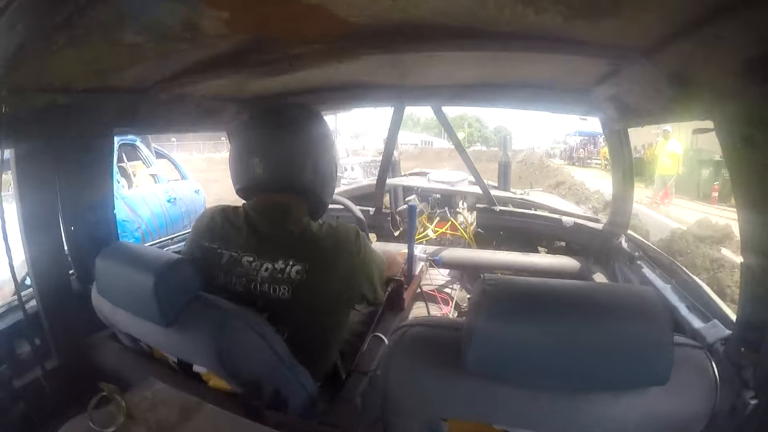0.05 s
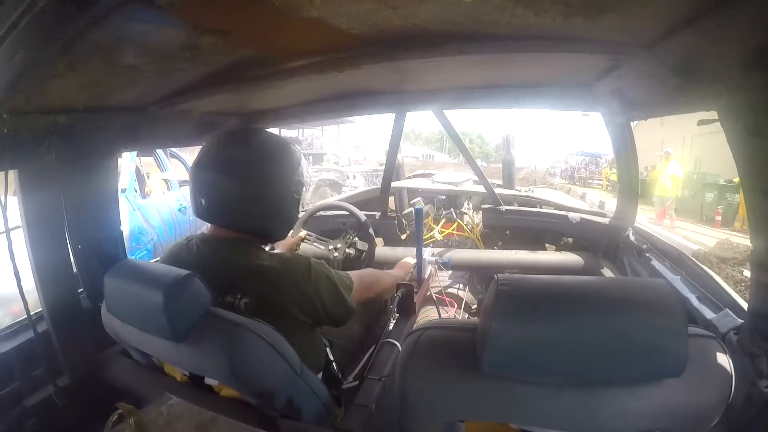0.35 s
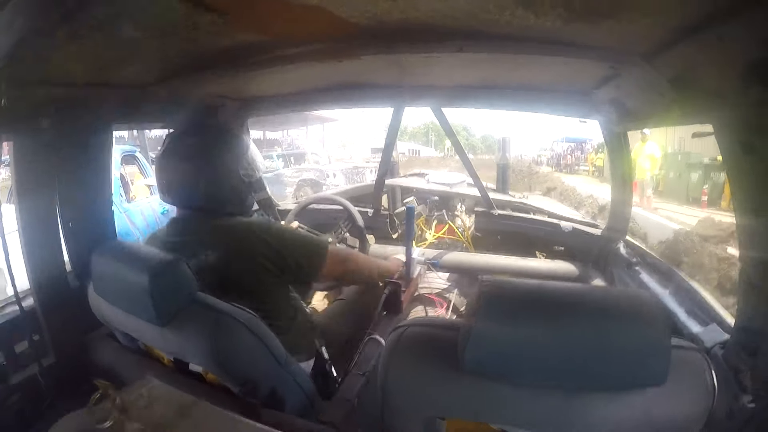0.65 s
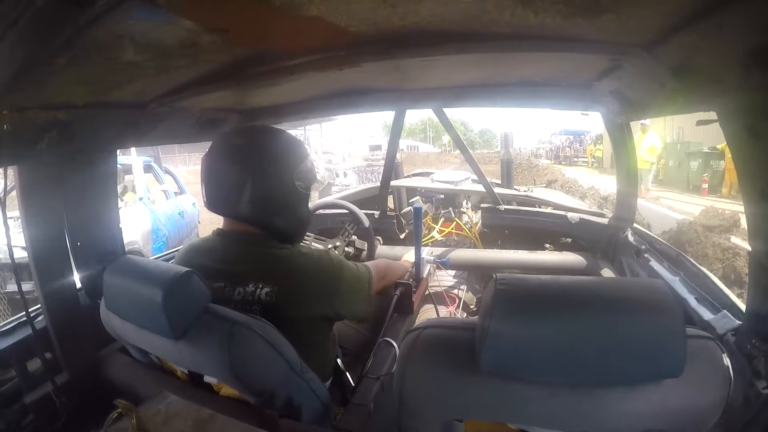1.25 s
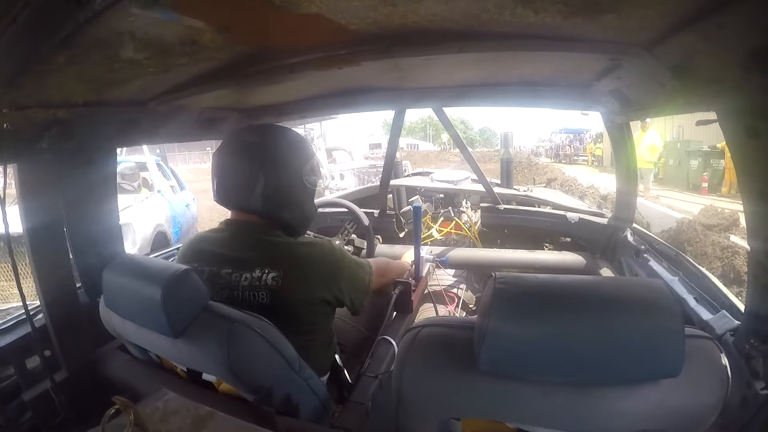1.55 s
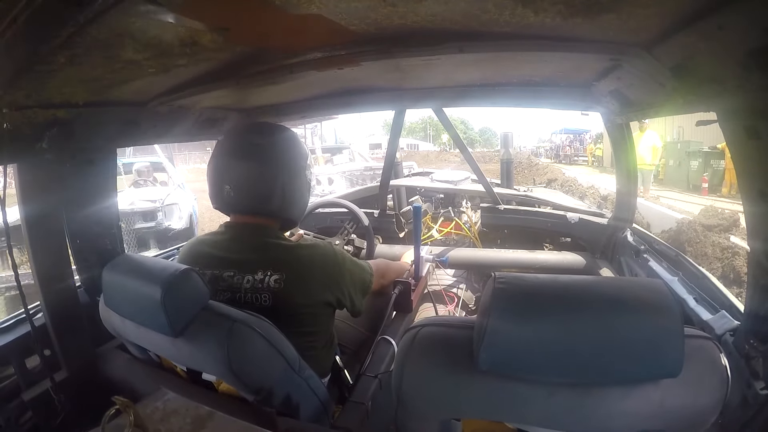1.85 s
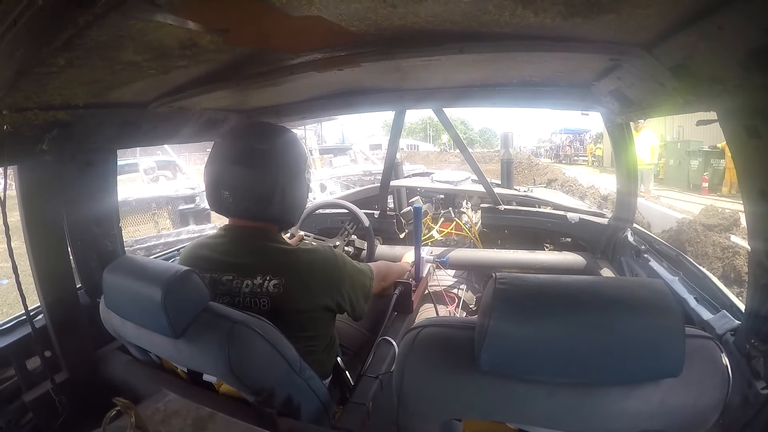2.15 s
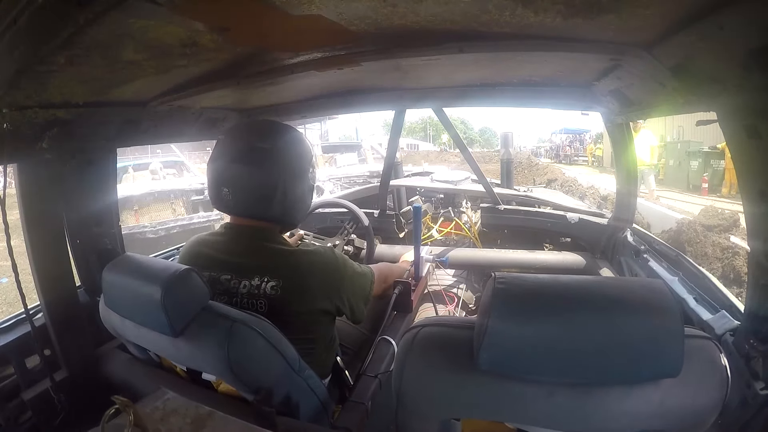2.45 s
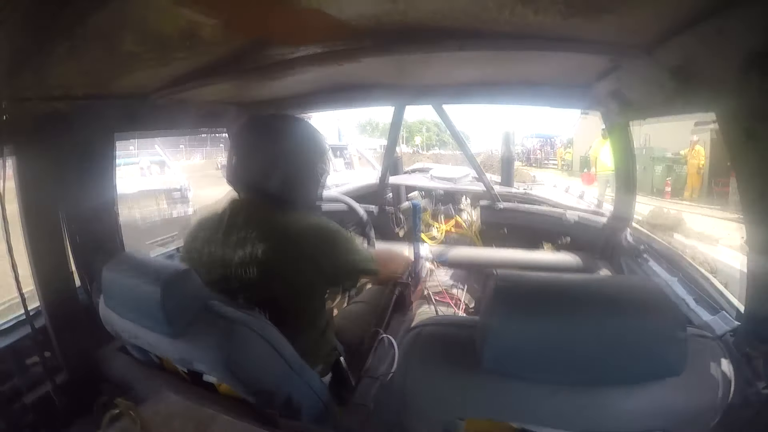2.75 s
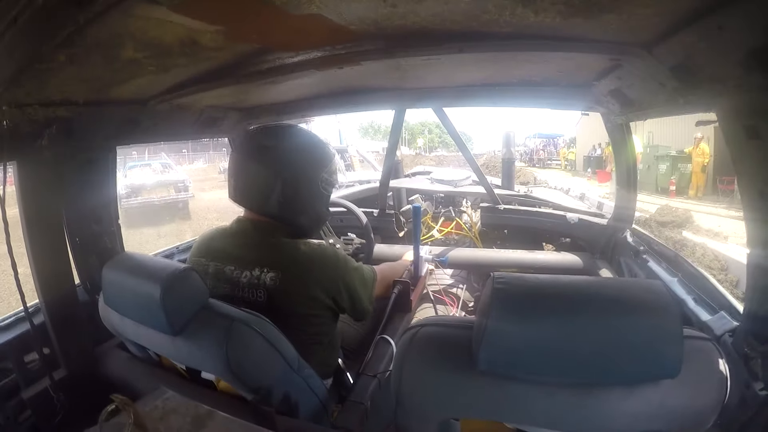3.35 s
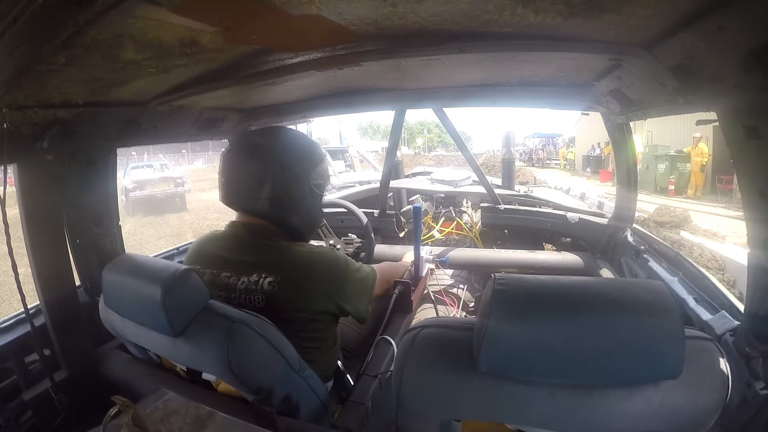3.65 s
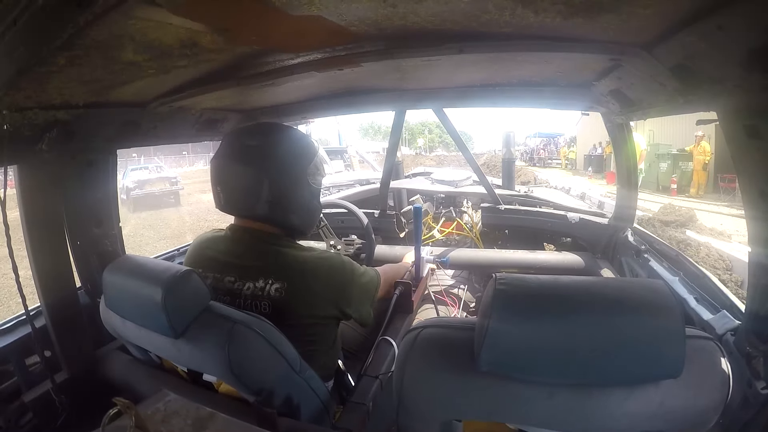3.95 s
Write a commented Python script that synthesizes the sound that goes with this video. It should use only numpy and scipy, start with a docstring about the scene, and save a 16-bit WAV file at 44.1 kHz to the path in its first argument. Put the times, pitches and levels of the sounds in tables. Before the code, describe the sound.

Heard from behind the driver's seat, a big engine rumbles steadily as a bare-shelled car lurches over dirt. The body thumps and loose panels clank and chatter in two main bouts, with a faint hiss between them.

```python
"""A V8 burbles at low revs, heard inside a stripped demolition-derby car lurching over rutted dirt.
Each jolt booms through the bare shell and sets loose metal chattering. Panels clank, ring and
briefly squeal; the tyres spray dirt on the body. A hiss, probably air drawn past the nearly shut
throttle, comes and goes. A fast limiter squashes the peaks."""
import sys
import numpy as np
from scipy import signal
from scipy.fft import rfft, irfft
from scipy.io import wavfile
from scipy.ndimage import uniform_filter1d, minimum_filter1d

SR = 44100
rng = np.random.default_rng(int(sys.argv[2]) if len(sys.argv) > 2 else 0)


def output_pcm(signal):
    """Save a mono or channel-first signal as 16-bit PCM at the path in sys.argv[1].

    Samples are clipped to [-1, 1] before scaling.
    """
    pcm = np.clip(np.atleast_2d(signal).T, -1, 1) * 32767
    wavfile.write(sys.argv[1], SR, np.round(pcm).astype(np.int16))


N = 176400

# Engine speed. Each row: time in seconds, firing rate in Hz.
FIRING_RATE = [(0, 103.7), (.3, 110.8), (1.1, 109.3), (1.45, 107), (1.72, 112.3), (2.22, 101.9),
               (2.32, 109.6), (2.39, 123.1), (2.48, 110.8), (2.75, 99.2), (3.3, 113.5), (3.55, 106.5),
               (3.8, 110.1)]
# Ground jolts. Each row: start in seconds, then low boom, cabin boom, panel boom and chatter in dB.
JOLTS = [(0.004, -27, -32, -26.5, -29), (0.054, -43, -15, -33, -31), (0.164, -13, -41.5, -19, -23.5),
         (0.619, -22, -41, -37, -38.5), (0.646, -16, -24.5, -21.5, -36), (0.664, -43, -15, -14.5, -28.5),
         (0.714, -16, -15, -26, -27), (0.758, -16.5, -16, -22, -22), (0.869, -28, -11, -22, -31.5),
         (0.964, -33, -12, -22.5, -46), (1.054, -27, -32, -22.5, -33), (1.11, -21, -13, -41, -38),
         (1.195, -25.5, -47, -19, -37), (1.414, -14.5, -16.5, -25, -32.5), (1.579, -36, -22, -18.5, -34),
         (2.53, -44, -19.5, -25.5, -25), (2.557, -18, -12.5, -37, -24.5), (2.599, -23, -46, -26, -24.5),
         (2.664, -25, -13, -24, -31), (2.72, -17, -14.5, -19, -29.5), (2.818, -28, -16, -24.5, -26),
         (3.072, -11, -30, -19.5, -31), (3.137, -17, -29, -34, -50)]
# Blows on loose panels. Each row: start in seconds, relative level in dB.
PANEL_BLOWS = [(0.055, -32), (0.062, -18.5), (0.152, -21), (0.17, -21), (0.225, -30), (0.528, -34.5),
               (0.635, -32), (0.666, -23), (0.681, -25.5), (0.693, -28), (0.761, -13), (0.766, -21.5),
               (0.818, -25.5), (0.848, -24.5), (0.892, -27), (0.962, -21), (0.968, -18.5), (0.974, -18.5),
               (0.989, -25), (1.009, -22.5), (1.036, -28), (1.061, -24), (1.087, -32), (1.122, -29),
               (1.143, -28.5), (1.233, -23), (1.437, -44), (1.585, -24), (1.637, -29.5), (2.601, -11),
               (2.704, -21), (2.724, -14), (2.815, -22.5), (2.824, -19), (2.894, -27.5), (2.92, -29.5),
               (3.08, -28.5), (3.11, -25), (3.152, -31), (3.193, -34.5), (3.224, -51), (3.286, -48),
               (3.347, -43.5), (3.365, -45), (3.427, -45), (3.525, -47.5), (3.587, -43)]
# Sheet metal response. Each row: frequency in Hz, gain in dB.
SHEET_METAL = [(60, -42), (170, -8), (255, 11), (345, 1), (480, 4.5), (630, 3), (860, -2.5), (1120, -8.5),
               (1330, -20.5), (1580, -7), (1830, -13), (2290, -14.5), (2650, -27.5), (3400, -32),
               (6000, -39), (15000, -66.5)]


def engine():
    """The firing rate drones in the cabin; unequal cylinders and rough ground add a low burble."""
    # Each row: time in seconds, relative level in dB.
    drone_levels = [(0, -20), (.14, -38.5), (.35, -28.5), (.52, -29.5), (.62, -33), (1.1, -32.5),
                    (1.38, -41.5), (1.46, -22.5), (1.62, -40), (1.74, -31), (1.84, -36), (1.93, -28.5),
                    (2.02, -37), (2.13, -30.5), (2.22, -38), (2.295, -22.5), (2.355, -35.5), (2.39, -28),
                    (2.5, -40), (2.7, -23), (2.98, -40), (3.38, -33), (3.55, -39), (3.85, -29), (3.93, -43)]
    burble_levels = [(0, -27.5), (.2, -26.5), (.55, -35), (.8, -26.5), (1.2, -27), (1.35, -31.5),
                     (1.88, -34), (2.05, -40), (2.32, -36), (2.5, -36), (2.62, -26), (2.95, -32.5),
                     (3.2, -36), (3.75, -34.5), (4, -41.5)]
    # Strength in dB of the eight cylinders, in firing order.
    cylinders_db = [4.5, -0.5, 1, 1, 0, 1.5, 0.5, 2]
    # Bare cabin response. Each row: frequency in Hz, gain in dB.
    cabin = [(10, -39), (20, -29.5), (39, 4), (48, -0.5), (64, -6.5), (85, -13), (125, -22), (148, -14.5),
             (185, -22.5), (245, -13), (310, -36), (500, -49.5), (5000, -100)]
    wobble_rad, flutter_db, scatter_db = 0.4, 1.4, 4
    cycles = np.cumsum(curve(FIRING_RATE)) / SR
    drone = np.sqrt(2) * np.sin(2 * np.pi * cycles + wobble_rad * wander(rate_hz=30))
    drone *= undb(curve(drone_levels) + 1 + flutter_db * wander(rate_hz=30))
    ground = unit_rms(colour(rng.standard_normal(N), cabin))
    firings = np.arange(1, int(cycles[-1]))
    firing_db = np.array(cylinders_db)[firings % len(cylinders_db)]
    strength = undb(firing_db + scatter_db * rng.standard_normal(len(firings)))
    pulses = np.zeros(N)
    pulses[np.searchsorted(cycles, firings)] = strength - strength.mean()
    burble = steady(unit_rms(colour(pulses, cabin)) + undb(-4) * ground, window_samples=4000)
    return drone + burble * undb(curve(burble_levels) + 1)


def shell_booms():
    """Each jolt rings the low modes of the shell, slightly detuned, with a cap on the drive."""
    # Each row: frequency in Hz, T60 in seconds, gain in dB, group (0 low, 1 cabin, 2 panel).
    shell_modes = [(36.1, 0.69, -8.5, 0), (63, 0.1, -1.5, 0), (88, 0.17, 2, 1), (114.7, 0.18, 0, 1),
                   (165, 0.19, -9.5, 2), (204.7, 0.21, -6, 2), (249.9, 0.31, -4.5, 2)]
    rise_s, cap_db = 0.004, -18.5
    out, t = np.zeros(N), np.arange(SR // 2) / SR
    for start_s, *drive_db, _ in JOLTS:
        boom = np.zeros(len(t))
        for hz, t60_s, mode_db, group in shell_modes:
            detune, phase_rad = rng.standard_normal(2)
            mode = np.sin(2 * np.pi * hz * (1 + 0.026 * detune) * t + phase_rad)
            gain = undb(mode_db + min(drive_db[int(group)], cap_db))
            boom += gain * mode * np.exp(-np.log(1000) * t / t60_s)
        add(out, start_s, boom * (1 - np.exp(-t / rise_s)))
    return out * undb(2.5)


def metal_chatter():
    """Loose metal patters after each jolt, dying fast and then settling slowly."""
    rise_s, fall_s, settle_db, settle_s, clump_db = 0.0028, 0.056, -11, 0.24, 2.5
    power, t = np.zeros(N), np.arange(N) / SR
    envelope = impact_envelope(t, rise_s, fall_s, settle_db, settle_s)
    for start_s, *_, db in JOLTS:
        add(power, start_s, (undb(db) * envelope) ** 2)
    patter = steady(colour(taps(per_s=900), SHEET_METAL), window_samples=2400)
    return patter * np.sqrt(power) * undb(-7 + clump_db * wander(rate_hz=120))


def panel_clanks():
    """Loose panels slap dully; edges that meet add a bright tick."""
    # Each row: start in seconds, relative level in dB.
    edge_blows = [(0.0024, -23), (0.0419, -37.5), (0.0628, -23), (0.1601, -24.5), (0.7627, -19),
                  (0.7674, -28), (0.967, -25.5), (0.9764, -23.5), (2.6003, -30), (2.696, -25.5),
                  (2.7253, -17.5), (2.8303, -26)]
    # Each row: frequency in Hz, gain in dB.
    edge_colour = [(800, -27), (2300, 9), (2850, 11), (3300, -5.5), (3800, -0.5), (4600, -7.5), (5700, -5),
                   (9000, -17), (15000, -33)]
    slaps = strikes(PANEL_BLOWS, SHEET_METAL, rise_s=0.0025, fall_s=0.0023, tail_db=-28.5)
    ticks = strikes(edge_blows, edge_colour, rise_s=0.0011, fall_s=0.0013, tail_db=-27)
    return slaps * undb(20) + ticks * undb(12)


def strikes(blows, body_colour, rise_s, fall_s, tail_db):
    """Brief scuffing contacts ring a body; harder blows lose more bass."""
    out, t = np.zeros(N), np.arange(SR // 8) / SR
    body = impulse_response(body_colour)
    contact = impact_envelope(t, rise_s, fall_s, tail_db, tail_s=0.011)
    hardest_db = max(db for _, db in blows)
    for start_s, db in blows:
        hit = signal.fftconvolve(rng.standard_normal(len(t)) * contact, body)
        cutoff_hz = 780 * undb((db - hardest_db) / 2)
        hit = signal.lfilter(*signal.butter(1, cutoff_hz, "high", fs=SR), hit)
        add(out, start_s, undb(db) * hit / np.linalg.norm(hit))
    return out


def panel_ring():
    """Struck panels ring on briefly, each blow favouring different modes."""
    # Each row: frequency in Hz, gain in dB.
    panel_modes = [(484, -4.5), (630, 1), (820, 0), (1115, -5.5), (1565, -15), (1825, -6.5), (2230, -9.5),
                   (2810, -19), (3650, -24.5)]
    rise_s, t60_s, scatter_db = 0.0025, 0.14, 3
    out, t = np.zeros(N), np.arange(SR // 2) / SR
    hz, mode_db = np.array(panel_modes, float).T
    envelope = (1 - np.exp(-t / rise_s)) * np.exp(-np.log(1000) * t / t60_s)
    for start_s, db in PANEL_BLOWS:
        detune, emphasis = rng.standard_normal((2, len(hz)))
        modes = np.sin(2 * np.pi * np.outer(hz * (1 + 0.0098 * detune), t))
        gains = undb(db + mode_db + scatter_db * emphasis)
        add(out, start_s, gains @ modes * envelope)
    return out * undb(-20)


def metal_squeals():
    """Metal slides on metal for a moment at an unsteady pitch."""
    # Each row: centre in seconds, half-width in seconds, pitch in Hz, peak in dB.
    squeals = [(2.573, 0.011, 2280, -32.5), (2.828, 0.012, 860, -27.5)]
    out, t = np.zeros(N), np.arange(N) / SR
    for centre_s, half_width_s, hz, db in squeals:
        tone = np.sin(2 * np.pi * hz * t + 0.5 * wander(rate_hz=120))
        out += tone * np.exp(-((t - centre_s) / half_width_s) ** 2) * undb(db)
    return out


def dirt_spray():
    """Grains thrown by the tyres crackle against the body in clumps."""
    # Each row: time in seconds, level in dB.
    spray_levels = [(0.1, -54), (.5, -67), (1.1, -53.5), (2.8, -77)]
    # Each row: frequency in Hz, gain in dB.
    grain_colour = [(1000, 14), (6300, 1), (15000, -11)]
    clump_db = 5
    grains = unit_rms(colour(taps(per_s=300), grain_colour))
    return grains * undb(curve(spray_levels) + clump_db * np.tanh(wander(rate_hz=51)))


def air_hiss():
    """Air hisses through a narrow gap, throbbing with the intake; weak flow is duller and sputters."""
    # Each row: time in seconds, relative level in dB.
    flow_levels = [(0, -58), (.2, -67), (.55, -73), (.8, -68), (1.08, -59.5), (1.7, -56), (1.95, -54),
                   (2.18, -53), (2.26, -59), (2.35, -60), (2.42, -53), (2.58, -49), (2.72, -57), (3.0, -75),
                   (3.2, -65), (3.38, -64), (3.55, -68), (4, -56)]
    # Each row: frequency in Hz, gain in dB.
    gap_colour = [(300, -9), (750, -4), (865, 5), (970, 1), (1100, 10), (1330, -2), (1630, 6), (1830, 0),
                  (2300, 7), (2480, 1), (3000, 2), (3650, -4), (4050, 0), (4380, -4), (5400, -3), (5950, 1),
                  (6400, -4), (7000, -2), (8500, -10), (13600, -13), (15300, -18)]
    split_hz, full_treble_db = 7240, -47
    flow_db = curve(flow_levels)
    air = unit_rms(colour(rng.standard_normal(N), gap_colour))
    low = signal.sosfiltfilt(signal.butter(2, split_hz, fs=SR, output="sos"), air)
    treble_gain = undb(0.1749 * (flow_db - full_treble_db))
    cycles = np.cumsum(curve(FIRING_RATE)) / SR
    throb = 1 + 0.23 * np.sin(np.pi * cycles + wander(rate_hz=30))  # half the firing rate
    flicker_db = 0.78 * wander(rate_hz=50) / treble_gain
    return (low + (air - low) * treble_gain) * throb * undb(flow_db + 5 + flicker_db)


def taps(per_s):
    """Random small impacts of unequal strength."""
    impulses = (rng.random(N) < per_s / SR) * rng.choice([-1, 1], N)
    strength_db = 3 * np.minimum(rng.exponential(size=N), 4)
    return impulses * undb(strength_db)


def impact_envelope(t, rise_s, fall_s, tail_db, tail_s):
    """Quick rise, fast fall and a weaker, slower tail."""
    return (1 - np.exp(-t / rise_s)) * (np.exp(-t / fall_s) + undb(tail_db) * np.exp(-t / tail_s))


def undb(db):
    """Decibels to gain."""
    return 10 ** (np.asarray(db) / 20)


def unit_rms(x):
    """Scale to rms 1."""
    return x / np.sqrt(np.mean(x ** 2) + 1e-18)


def curve(rows):
    """Join (seconds, value) rows by straight lines."""
    return np.interp(np.arange(N) / SR, *np.array(rows, float).T)


def wander(rate_hz):
    """Smooth random drift of rms 1."""
    hold = max(int(SR / rate_hz), 2)
    steps = np.repeat(rng.standard_normal(N // hold + 1), hold)
    return unit_rms(uniform_filter1d(uniform_filter1d(steps, hold), hold)[:N])


def impulse_response(points, size=8192):
    """Minimum-phase, unit-energy response with the given (Hz, dB) colour."""
    hz, db = np.array(points, float).T
    bins_hz = np.maximum(np.arange(size // 2 + 1) * SR / size, 1)
    magnitude = undb(np.interp(np.log(bins_hz), np.log(hz), db))
    cepstrum = irfft(np.log(magnitude))
    cepstrum[1:size // 2] *= 2
    cepstrum[size // 2 + 1:] = 0
    response = irfft(np.exp(rfft(cepstrum)))
    return response / np.linalg.norm(response)


def colour(x, points):
    """Pass a sound through a body with the given (Hz, dB) colour."""
    return signal.fftconvolve(x, impulse_response(points))[:len(x)]


def steady(x, window_samples):
    """Hold the running rms near 1."""
    power = uniform_filter1d(uniform_filter1d(x ** 2, window_samples), window_samples)
    return x / np.sqrt(np.maximum(power, 0) + 1e-12)


def add(out, start_s, x):
    """Mix x into out from start_s."""
    i = min(max(int(start_s * SR), 0), N - 1)
    out[i:i + len(x)] += x[:N - i]


def scene():
    """Mono mix, heard from behind the driver's seat."""
    bodywork = shell_booms() + metal_chatter() + panel_clanks() + panel_ring() + metal_squeals()
    return (bodywork + dirt_spray() + air_hiss() + engine())[None]


def record(dry):
    """Fast peak limiter, then a steep low-pass."""
    ceiling, window_s, cutoff_hz = 0.24, 0.0021, 15300
    window = int(window_s * SR)
    gain = ceiling / np.maximum(np.abs(dry), ceiling)
    gain = uniform_filter1d(minimum_filter1d(gain, window), window)
    return signal.sosfilt(signal.ellip(10, .2, 80, cutoff_hz, fs=SR, output="sos"), dry * gain)


dry = scene()
out = record(dry)
output_pcm(out)
```